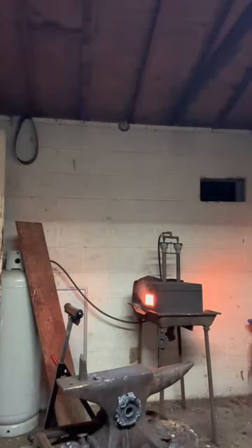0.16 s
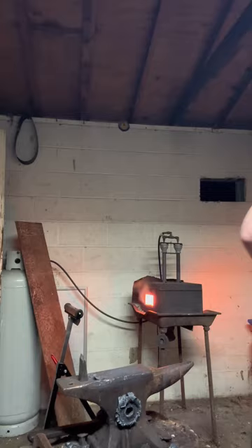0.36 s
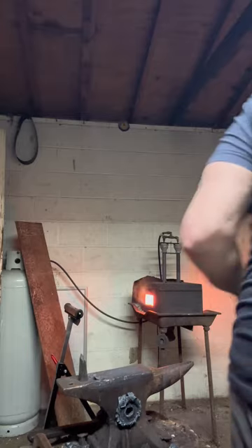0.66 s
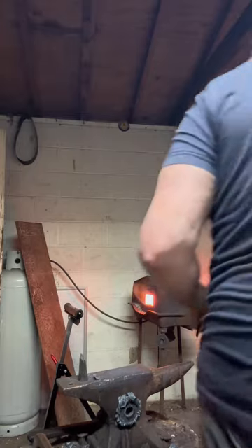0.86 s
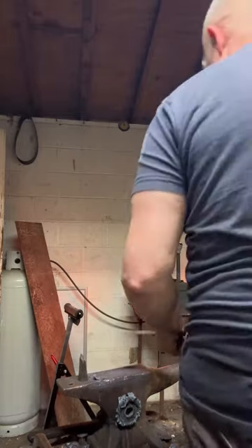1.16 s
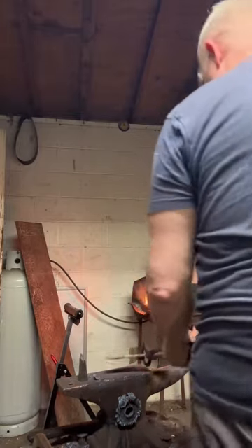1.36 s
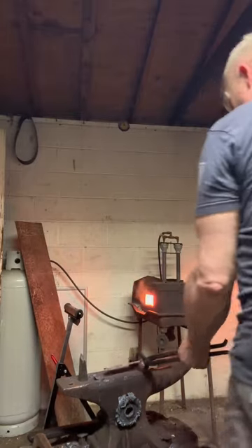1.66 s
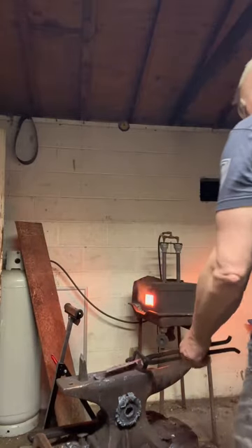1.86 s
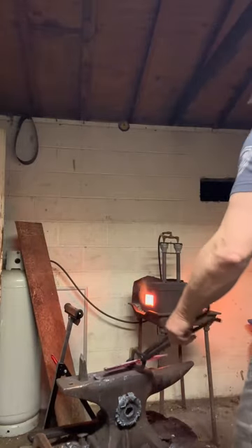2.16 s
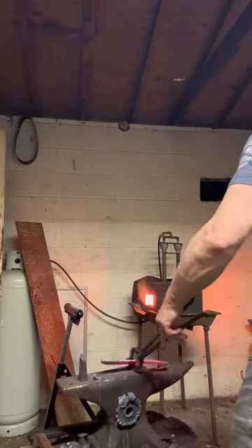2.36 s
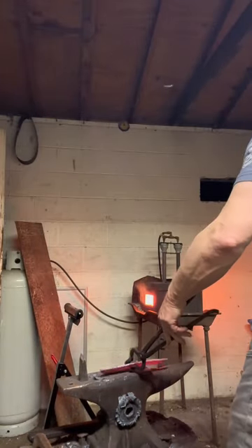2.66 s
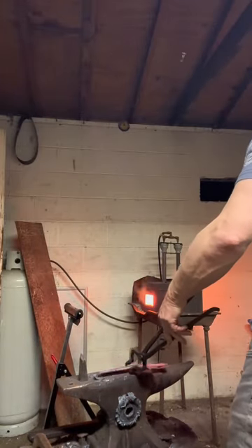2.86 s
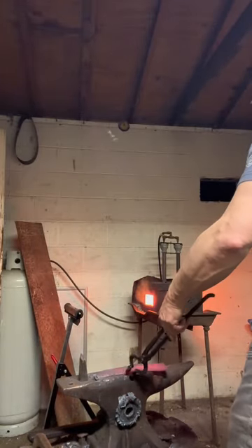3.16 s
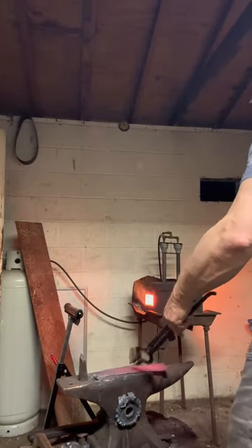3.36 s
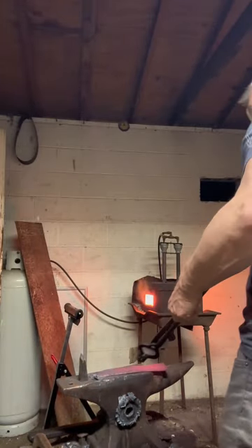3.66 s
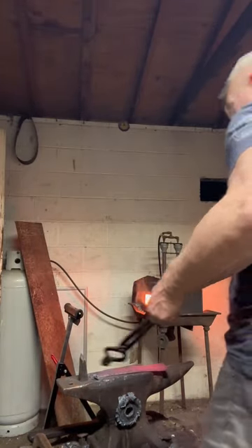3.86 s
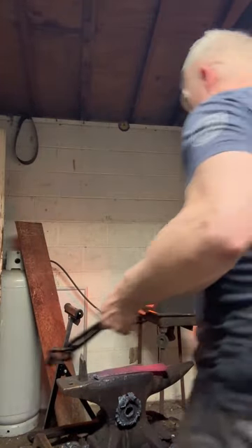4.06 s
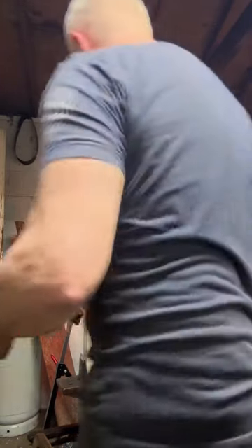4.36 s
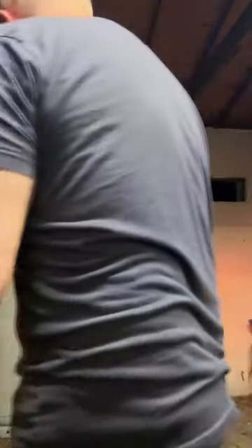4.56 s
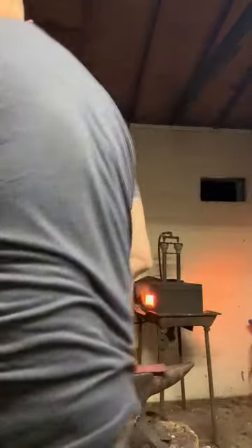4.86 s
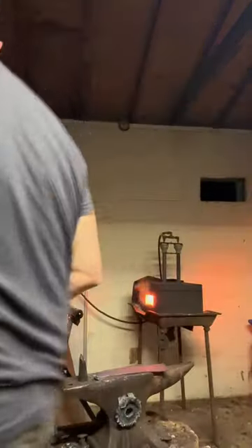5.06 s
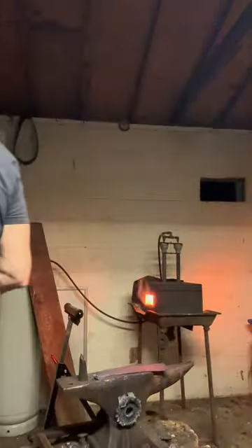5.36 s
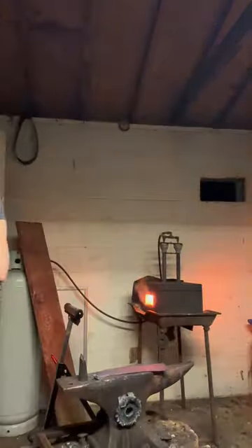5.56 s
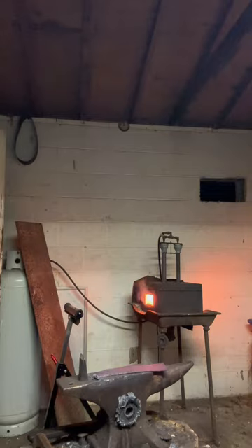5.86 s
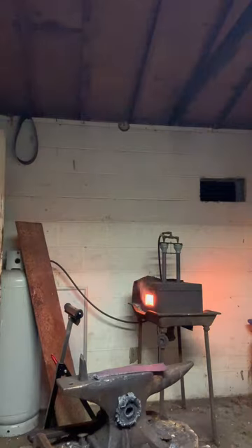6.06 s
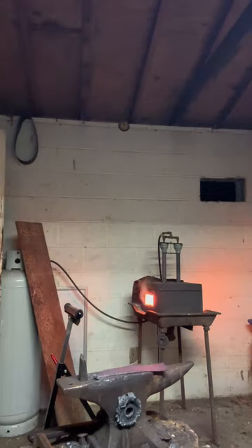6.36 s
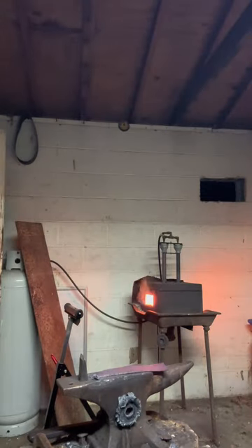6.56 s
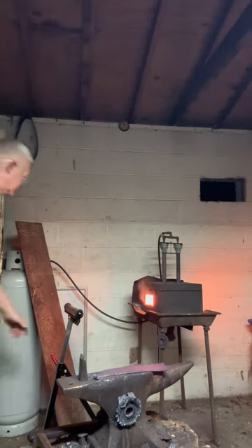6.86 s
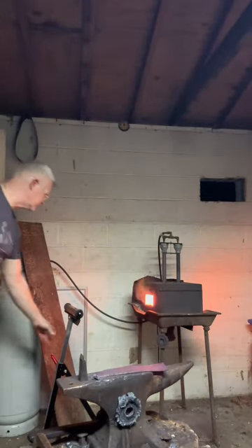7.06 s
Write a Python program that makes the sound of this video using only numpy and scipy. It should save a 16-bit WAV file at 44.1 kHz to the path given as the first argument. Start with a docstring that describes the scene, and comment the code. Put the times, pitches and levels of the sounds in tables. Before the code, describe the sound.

A propane forge roars continuously in a block-walled workshop, deep and hollow with a gas hiss above. Long steel tongs jangle loudly at the start and fade to faint ticks. A hot bar clinks on the anvil near three seconds, then the tong jaws snap with a sharp clank. Shoes scuff gritty floor later as the burner surges. Fixed stereo microphone a few metres away.

```python
"""Propane forge and steel tongs

A forge roars steadily in a block-walled workshop: noise shaped by flame, room and burner-mouth resonances.
Its gas jet is a band of hiss above. A smith's tongs jangle and rattle as he walks to the anvil, a hot bar
clinks there and the jaws clank as they let it go: chatters of tiny blows that crack and ring decaying modes.
Later his shoes scuff the gritty floor in strokes of clumped noise grains."""
import sys
import numpy as np
from scipy import signal
from scipy.fft import rfft, irfft, next_fast_len
from scipy.io import wavfile
from scipy.ndimage import uniform_filter1d

SR = 44100
rng = np.random.default_rng(int(sys.argv[2]) if len(sys.argv) > 2 else 0)


def master(y):
    """Save y as 16-bit WAV."""
    cut = np.clip(np.atleast_2d(y).T, -1, 1)
    pcm = np.round(cut * 32767)  # scale
    wavfile.write(sys.argv[1], SR, pcm.astype(np.int16))


N = 317961


def amp(db):
    """Decibels to gain."""
    return 10 ** (np.asarray(db) / 20)


def evened(x):
    """Scales to rms 1."""
    return x / np.sqrt(np.mean(x ** 2) + 1e-20)


def read(points, hz):
    """Reads a table along a log-frequency axis."""
    f, value = np.transpose(points)
    return np.interp(np.log(hz + 1), np.log(np.abs(f) + 1), value)


def add(mix, s, sound):
    """Mixes a stereo sound in at time s."""
    part = mix[:, max(round(s * SR), 0):][:, :sound.shape[1]]
    part += sound[:, :part.shape[1]]


def coloured(x, points):
    """Filters by a (Hz, dB) table."""
    size = next_fast_len(x.shape[-1] + 1024)
    gain = amp(read(points, np.fft.rfftfreq(size, 1 / SR)))
    return irfft(rfft(x, size) * gain, size)[..., :x.shape[-1]]


def turbulence(density, hz):
    """Churning gas as two unrelated noises of the given spectral density."""
    size = 2 * (len(hz) - 1)
    spectrum = rfft(rng.standard_normal((2, size))) * density * np.sqrt(SR / 2)
    return irfft(spectrum, size)[:, :N]


def peaks(table, hz):
    """Power spectrum of a set of steep resonances."""
    return sum((amp(db) / (1 + ((hz - centre) / (0.58 * width)) ** 2)) ** 2 for centre, width, db in table)


def swept(x, gain):
    """A moving filter; gain is a function of frequency and time."""
    hz, t, z = signal.stft(x, SR, nperseg=2048, noverlap=1536)
    return signal.istft(z * gain(hz[:, None], t), SR, nperseg=2048, noverlap=1536)[1][:, :N]


# Burner drive. Each row: time in seconds, blast in dB before the roar and the jet take their shares of it.
BLAST = [(0, -1.35), (1.7, 0), (3.1, 0.03), (5.3, 0.87), (6.45, 1.5), (6.95, 4.5), (7.21, 6)]
ROAR_FOLLOW, JET_FOLLOW = 0.68, 0.65  # dB of roar or jet per dB of blast


def burner_blast(t):
    """How hard the burner blows: it creeps up, then surges near the end."""
    return np.interp(t, *np.transpose(BLAST))


# Smooth body of the flame noise. Each row: frequency in Hz, density in dB per Hz before trim and blast.
FLAME = [(20, -92), (37, -84), (52, -62.5), (170, -69), (380, -61.5), (520, -66), (720, -71), (1000, -79),
         (1400, -86), (2600, -100), (5000, -112), (16000, -130)]
# Standing waves of the room. Each row: centre in Hz, nominal width in Hz, peak in dB per Hz before trim and blast.
HOLLOWS = [(58.3, 12.8, -54), (66.5, 9.2, -63.5), (110.3, 8, -54.5), (148.4, 7.5, -51), (191, 36, -58),
           (216.2, 28.7, -48), (291.7, 33, -53.5), (320.4, 17.3, -48.5), (377.2, 29, -48.5),
           (423.8, 22, -48.5), (482.3, 12.7, -54.5), (522.5, 53, -58.5), (552, 11.3, -50), (658.5, 40, -60),
           (830, 210, -73)]
SWELL_DB, SWELL_S = -3.5, 0.13  # the roar starts this far down and swells in over about this time


def flame_roar(hz, t, trim_db=-0.3):
    """Turbulent flame noise drives the standing waves of the room, so the roar booms."""
    density = np.sqrt(amp(read(FLAME, hz)) ** 2 + peaks(HOLLOWS, hz))
    swell_in = SWELL_DB * np.exp(-(t / SWELL_S) ** 4)
    return turbulence(density, hz) * amp(trim_db + ROAR_FOLLOW * burner_blast(t) + swell_in)


# Forge mouth and burner tube. Each row: centre in Hz, nominal width in Hz, peak in dB per Hz before the rush level.
MOUTH = [(1140, 150, -86), (1325, 111, -74.5), (1623, 164, -80.5), (1810, 77, -80), (1987, 55, -83.5),
         (2202, 120, -83), (2368, 94, -86), (2857, 430, -89.5), (3526, 83, -87), (9400, 390, -96)]
WANDER_SHARE, WANDER_DB = .009, 1.0  # rms wander: share of pitch, strength in dB


def mouth(hz, t):
    """Gain of the forge mouth: each resonance wanders in pitch and strength as the hot gas churns."""
    noise = rng.standard_normal((len(MOUTH), 2, len(t)))
    drift = evened(uniform_filter1d(uniform_filter1d(noise, size=16), size=8))
    wandering = [(centre * (1 + WANDER_SHARE * bend), width, db + WANDER_DB * swell)
                 for (centre, width, db), (bend, swell) in zip(MOUTH, drift)]
    return np.sqrt(peaks(wandering, hz))


# Rush from the forge mouth. Each row: time in seconds, level in dB before trim.
RUSH_LEVEL = [(0, 2), (1.2, 1), (2.4, 1), (3.3, 1.5), (4.2, 2.5), (5.4, 0.7), (6.4, 2.5), (7.21, 3)]


def mouth_rush(hz, t, trim_db=0.48):
    """Flat noise rushes out through the wandering resonances of the forge mouth."""
    level_db = np.interp(t, *np.transpose(RUSH_LEVEL))
    return swept(turbulence(0.96, hz), mouth) * amp(trim_db + level_db)


# The smith passes before the forge. Each row: middle in seconds, half length in seconds, hiss change in dB.
PASSES = [(1.29, 0.93, -1.5), (4.44, 1, -3)]


def shadow(t):
    """Hiss level change in dB while the smith's body screens the forge."""
    return sum(change_db * np.exp(-((t - s) / half) ** 2) for s, half, change_db in PASSES)


# Gas jet hiss. Each row: frequency in Hz, density in dB per Hz before blast and shadow.
JET = [(500, -110), (2600, -97), (4000, -91.5), (4800, -93.5), (5600, -91), (6600, -100.5), (7300, -98.5),
       (8200, -97), (8800, -99.5), (10500, -99.5), (12200, -106), (13000, -106), (14200, -103),
       (15800, -108)]


def gas_jet(hz, t):
    """Gas hisses out of the jet as treble noise, following the blast and dipping behind the smith."""
    return turbulence(amp(read(JET, hz)), hz) * amp(JET_FOLLOW * burner_blast(t) + shadow(t))


# Swelling and sinking resonances. Each row: middle in seconds, half length in seconds, centre in Hz,
# half width in octaves, change in dB.
SWELLS = [(.62, 0.18, 434, 0.043, 8), (1.248, 0.089, 552, 0.056, 15), (1.63, 0.099, 325, .053, 8.5),
          (1.8, 0.43, 216.4, 0.037, 7.5), (4.43, .13, 386, 0.049, 11), (4.503, 1.4, 657, .053, -5),
          (5.2, 0.12, 544, 0.085, -7), (5.24, 0.12, 327, 0.086, 8), (4.948, .12, 58, 0.22, 11),
          (6.92, 0.11, 220, 0.039, 5.5), (1.603, 1.4, 1360, .15, -0.5), (5.1, 0.48, 1770, 0.12, 3.5)]


def swelling(hz, t):
    """Gain of the resonances that swell or sink as the smith moves."""
    total_db = 0
    for s, half, centre, octaves, db in SWELLS:
        off_pitch = np.log2((hz + 1) / centre) / octaves
        total_db = total_db + db * np.exp(-((t - s) / half) ** 2 - off_pitch ** 2)
    return amp(total_db)


def rippled(x, fixed_db, drift_db):
    """Wall reflections carve fine ripples in the middle and treble; some stand still, some drift."""
    hz, _, z = signal.stft(x, SR, nperseg=2048, noverlap=1536)
    still = evened(uniform_filter1d(rng.standard_normal((2, len(hz), 1)), size=2, axis=1))
    drift = uniform_filter1d(rng.standard_normal(z.shape[1:]), size=4, axis=0)
    drift = evened(uniform_filter1d(drift, size=22, axis=1))
    depth = read([(500, 0.054), (1100, 1.0), (4000, 1.0), (10000, 0.0)], hz)[:, None]
    ripple = amp(depth * (fixed_db * still + drift_db * drift))
    return signal.istft(z * ripple, SR, nperseg=2048, noverlap=1536)[1][:, :N]


def burner(flutter_db=0.88):
    """Flame roar, mouth rush and jet hiss share the wall ripples and one small flutter (rms dB)."""
    hz = np.fft.rfftfreq(2 * next_fast_len(N // 2 + 1), 1 / SR)
    t = np.arange(N) / SR
    fire = swept(flame_roar(hz, t) + mouth_rush(hz, t), swelling)
    flutter = evened(uniform_filter1d(rng.standard_normal(N), size=2500))
    return rippled(fire + gas_jet(hz, t), fixed_db=1.5, drift_db=1.7) * amp(flutter_db * flutter)


# Workshop echo. Each row: frequency in Hz, t60 in seconds.
ROOM = [(200, 0.36), (2000, 0.44), (6000, 0.19), (14000, 0.21)]


def workshop(x, wet_db):
    """Direct sound plus dense wall reflections, each band dying at its own t60."""
    t = np.arange(SR // 2) / SR
    taps = rng.standard_normal((2, len(t))) * (t > .003)
    hz, when, z = signal.stft(taps, SR, nperseg=256)
    tail = signal.istft(z * amp(-60 * when / read(ROOM, hz)[:, None]), SR, nperseg=256)[1]
    tail *= amp(wet_db) / np.linalg.norm(tail[0])
    tail[:, 0] += 1  # direct sound
    return signal.fftconvolve(x, tail, axes=1)


def steel(length, tilt_db, modes, crack_colour, crack_db, crack_s, wet_db, uneven_db, touches_per_s, shimmer):
    """One contact is a chatter of tiny blows; each blow gives a brief crack and feeds the steel's modes."""
    t = np.arange(SR // 2) / SR
    hz, db, t60 = np.transpose(modes)[:, :, None]
    touching = (rng.random(len(t)) < touches_per_s / SR) * (t < length)
    blows = .5 * rng.standard_normal(len(t)) * touching
    blows[0] = 1
    # the energy of the blows piles up in each mode and leaks away
    energy = np.array([signal.lfilter([1], [1, -amp(-60 / SR / life) ** 2], blows ** 2) for life in t60[:, 0]])
    # the place of contact sets each mode's share
    weight = amp(db + tilt_db * np.log2(hz / 4000) + uneven_db * rng.standard_normal(hz.shape))
    # reflections and fresh blows make each partial shimmer (rms radians), differently at each port
    waver = rng.random((2, len(hz), len(t)), np.float32) - .5
    waver = evened(uniform_filter1d(waver, size=600))
    phase = np.float32(2 * np.pi * (hz * t + rng.random((2, len(hz), 1)))) + np.float32(shimmer) * waver
    ring = (weight * np.sqrt(energy) * np.sin(phase)).sum(1)
    tilted = [(f, d + tilt_db * np.log2(max(f / 4000, .5))) for f, d in crack_colour]
    snap = coloured(rng.standard_normal((2, len(t))), tilted) * np.exp(-t / crack_s)
    snaps = signal.fftconvolve(blows[None], snap, axes=1)[:, :len(t)]
    crack = workshop(snaps, wet_db)[:, :len(t)]
    sound = evened(ring) + amp(crack_db) * evened(crack)
    loudest = uniform_filter1d((sound ** 2).mean(0), size=1024).max()
    return sound / np.sqrt(loudest)


# Ring of the long tongs. Each row: mode in Hz, level in dB hanging free, level in dB held in the hand,
# t60 in seconds. Levels are relative, before tilt and favour.
TONGS = [(712, -1, -12, .4), (1300, -12, -10, .3), (1561, 3, -7, .28), (1658, -5, -3, .32),
         (2040, -5, -9, .3), (2478, -4, -6, .32), (2513, -4, -1, .28), (2718, -1, 3, .25),
         (2887, -4, -2, .36), (3010, -7, -6, .28), (3085, -18, -3, .22), (3250, -14, -9, .25),
         (3424, -17, -12, .3), (3580, -7, -5, .24), (3700, 3, -6, .27), (3876, -15, -10, .25),
         (4107, 0, -8, .22), (4200, -7, -1, .3), (4270, -11, -3, .3), (4680, -11, -8, .2),
         (4782, -2, -7, .25), (4880, -14, -6, .22), (5243, -13, -12, .25), (5380, -18, -10, .2),
         (5470, -7, -10, .2), (5686, -7, -13, .6), (5805, -6, -14, .3), (6210, -11, -13, .2),
         (6440, -10, -12, .17), (7120, -10, -16, .17), (7820, -6, -13, .17), (8500, -15, -18, .15),
         (9250, -16, -19, .2), (10100, -17, -21, .2), (10450, -17, -21, .2), (12000, -22, -26, .2)]
# Jangle and rattle. Each row: start in seconds, loudest short-term level in dB, chatter length in seconds,
# treble tilt in dB per octave, grip from 0 (free) to 1 (held), frequency in Hz that the contact favours.
RATTLES = [(0, -30.5, .04, 0, 0, 3700), (.04, -34.5, .016, 1, 0, 1620), (.055, -28.5, 0.011, -1.5, 0, 3800),
           (.072, -30, 0.019, -1.5, 0.2, 2520), (.108, -32.5, 0.013, 0, 0.1, 3570),
           (.127, -34.5, 0.011, 2, 0, 4800), (0.151, -38, .03, -2, 0.5, 5700),
           (.245, -48, .012, -4, .8, 2700), (.258, -39.5, .022, -3, 1, 2930),
           (.338, -47.5, .025, -4, .6, 2700), (.405, -55, .03, -3, 1, 4250), (.493, -51, .004, -7, 1, 4250),
           (0.542, -46, .03, -2.5, 0.95, 4250), (.6, -53, .04, -9, 0.9, 2500),
           (.684, -55, .02, 2, 0.9, 4250), (0.725, -49.5, .008, 2, 1, 4250),
           (.742, -51, .008, -4, 0.9, 2500), (0.839, -54, .01, -1, 1, 2700),
           (.851, -48.5, .018, -3, 1, 3670), (.957, -49.5, .01, -1, 0.9, 4850),
           (0.969, -50, .025, 1, 0.7, 2550), (1.02, -55, .02, 2, 1, 2700),
           (1.07, -44.5, .03, -6, 0.9, 1680), (1.641, -49.5, .014, 3, 0.9, 2500),
           (2.859, -51, .025, -2, 1, 2900)]
# Crack against ring in dB: hanging free, then held in the hand.
TONGS_CRACK_DB = (-9, -8)
FAVOUR_DB, FAVOUR_OCTAVES = 4.5, .13  # lift of the favoured modes, half width


def tongs():
    """Long steel clatters, its cracks mostly wall echo; grip and place of contact set which modes ring."""
    colour = [(300, -22), (800, 0), (2800, 3.5), (4200, 3), (6000, -2), (8000, -11), (10500, -9),
              (13000, -19), (15800, -26)]
    out = np.zeros((2, N))
    hz, free, held, t60 = np.transpose(TONGS)
    for s, level_db, length, tilt_db, grip, favoured_hz in RATTLES:
        favour = FAVOUR_DB * np.exp(-(np.log2(hz / favoured_hz) / FAVOUR_OCTAVES) ** 2)
        db = free + np.clip(grip, 0, 1) * (held - free) + favour
        crack_db = np.interp(grip, [0, 1], TONGS_CRACK_DB)
        rattle = steel(length, tilt_db, np.transpose([hz, db, t60]), colour, crack_db, crack_s=.002,
                       wet_db=4, uneven_db=2, touches_per_s=800, shimmer=.6)
        add(out, s, amp(level_db) * rattle)
    return out


# Short ring of the jaws. Each row: mode in Hz, relative level in dB before tilt, t60 in seconds.
JAWS = [(1960, -11, .3), (2293, -5, .3), (2835, 2, .34), (3246, -3, .22), (3690, 7, .17), (3900, 1, .11),
        (4130, 4, .12), (4400, -3, .14), (4850, -6, .17), (5776, -1, .17), (5940, 0, .22), (6670, 3, .13),
        (7450, -2, .14), (8650, -6, .12), (8930, 1, .14), (9260, -5, .15), (9738, -2, .13),
        (10270, -3, .15), (11560, -6, .15), (12960, -3, .15), (13220, -3, .15), (13600, -5, .15)]
# The jaws bite the bar, later snap together. Each row: start in seconds, loudest short-term level in dB,
# chatter length in seconds, treble tilt in dB per octave.
CLANK = [(1.642, -47, .003, 0), (1.655, -54, .003, 0), (3.4387, -30.5, .001, 3.5)]


def jaws():
    """Bright, quickly damped clanks as the jaws take the bar, and as they let go and snap together."""
    colour = [(300, -15), (1500, -4), (3000, 0), (3550, 8), (4100, 10), (4900, -1), (6500, 1), (9000, 0),
              (11500, -4), (13400, -1), (14300, -12), (15800, -12)]
    out = np.zeros((2, N))
    for s, level_db, length, tilt_db in CLANK:
        clank = steel(length, tilt_db, JAWS, colour, crack_db=-2.5, crack_s=.001,
                      wet_db=1, uneven_db=1, touches_per_s=400, shimmer=.6)
        add(out, s, amp(level_db) * clank)
    return out


# Ring of the bar on the anvil. Each row: mode in Hz, relative level in dB before tilt, t60 in seconds.
BAR = [(2050, -7, .2), (2250, -8, .2), (2820, -6, .28), (3381, -7, .28), (4130, -4, .12), (4290, 2, .13),
       (4540, -3, .12), (5566, -1, .15), (5900, -7, .12), (6202, 2, .14), (7250, -5, .12), (7520, -3, .12),
       (7810, 8, .12), (8400, -8, .12), (9000, -7, .12), (9350, -7, .11), (9660, -4, .1), (10640, -2, .14),
       (11600, -11, .11), (12450, -6, .11), (12750, -5, .1), (13400, -13, .1)]
# Knocks and scrapes. Each row: start in seconds, loudest short-term level in dB, chatter length in seconds,
# treble tilt in dB per octave, crack against ring in dB.
KNOCKS = [(1.654, -50, .003, -5, 0), (2.461, -48, .002, -3, 4), (2.487, -50, .003, -3, -7),
          (2.519, -51, .012, -2, 3), (2.575, -58, 0.037, -9, 8), (2.71, -60, .003, -5, 6),
          (2.793, -61, .025, -7, 8), (2.905, -56, .04, -7, 7), (2.957, -43.5, .003, 4, -1),
          (2.964, -39.5, 0.0089, -2, -6), (2.975, -43, .012, -1, -7)]


def bar():
    """The bar ticks, scrapes and clinks on the anvil as it is set down and turned: short rings and cracks."""
    colour = [(300, -12), (1500, 0), (3200, 1), (4300, 5), (6000, 3), (7800, 1), (10000, -2), (12700, -4),
              (15800, -13)]
    out = np.zeros((2, N))
    for s, level_db, length, tilt_db, crack_db in KNOCKS:
        knock = steel(length, tilt_db, BAR, colour, crack_db, crack_s=.0012,
                      wet_db=1, uneven_db=1, touches_per_s=500, shimmer=.6)
        add(out, s, amp(level_db) * knock)
    return out


# Shoes on grit. Each row: start in seconds, length in seconds, level in dB before the stroke shapes it,
# treble tilt in dB per octave.
SCUFFS = [(5.694, 0.081, -54, 5), (6.214, 0.15, -38.5, 0.5), (6.844, 0.082, -37, -0.5)]
# Colour of the scuffs. Each row: frequency in Hz, relative level in dB before tilt.
GRIT = [(100, -5), (350, 22), (800, -6), (1600, 2.5), (3000, 5), (4500, 3.5), (6200, 0), (8000, -3),
        (10500, -4.5), (14000, -13)]


def shoes(grain_db=3.6, wet_db=-1):
    """A sole drags over grit: dense grains swell and fade, in clumps as it catches and slips."""
    out, t = np.zeros((2, N)), np.arange(SR // 3) / SR
    for s, length, level_db, tilt_db in SCUFFS:
        spikes = amp(grain_db * np.minimum(rng.exponential(1, len(t)), 5))
        grains = rng.standard_normal((2, len(t))) * spikes
        clumps = amp(2.2 * evened(uniform_filter1d(rng.standard_normal(len(t)), size=110)))
        stroke = np.abs(np.sin(np.pi * np.minimum(t / length, 1))) ** .7
        colour = [(hz, db + tilt_db * np.log2(hz)) for hz, db in GRIT]
        scrape = workshop(evened(coloured(grains * clumps, colour)) * stroke, wet_db)
        # the division makes room for the echo's energy
        add(out, s, amp(level_db) * scrape / np.sqrt(1 + amp(wet_db) ** 2))
    return out


# Likeness of the two ports. Each row: frequency in Hz, likeness from 0 to 1.
LIKENESS = [(60, .9995), (200, .992), (380, .975), (650, .9), (1000, .58), (1340, .3), (2200, .68),
            (3000, .65), (4500, .4), (5600, .55), (6600, .7), (7300, .99), (8400, .99), (9500, .8),
            (10800, .99), (12800, .99), (13800, .8), (15000, .98)]
# Phase between the ports. Each row: frequency in Hz, lead of the left in radians.
LEAD = [(60, 0), (250, -.03), (600, -.1), (1030, .8), (2150, -.2), (3100, .8), (4400, .4), (5400, -1.4),
        (6700, -2.1), (7300, -3.05), (8300, -3.25), (9400, -4.7), (10600, -6.1), (12700, -6.5), (14200, -8),
        (14900, -9.3)]
# Balance of the ports. Each row: frequency in Hz, left minus right in dB.
BALANCE_DB = [(60, 0), (200, -.8), (400, -1.2), (700, -1.8), (1300, -1.8), (2800, .8), (5500, 1.1),
              (10000, 0)]


def ports(pair):
    """The two microphone ports: alike in the bass, diffuse in the middle, alike but out of step in the treble."""
    size = next_fast_len(N + 2048, True)
    hz = np.fft.rfftfreq(size, 1 / SR)
    common, other = rfft(pair, size)
    alike = np.clip(read(LIKENESS, hz), 0, 1)
    right = (alike * common + np.sqrt(1 - alike ** 2) * other) * np.exp(-1j * read(LEAD, hz))
    lean = amp(read(BALANCE_DB, hz) / 2)
    return irfft(np.array([common * lean, right / lean]), size)[:, :N]


def scene():
    """The forge, and the smith at work around it."""
    return ports(burner() + tongs() + jaws() + bar() + shoes())


EDGE_HZ = 15800


def record(dry):
    """A steep low-pass limits the band at its upper edge."""
    lowpass = signal.firwin(255, EDGE_HZ, window=("kaiser", 9), fs=SR)
    return signal.oaconvolve(dry, lowpass[None], "same")


dry = scene()
out = record(dry)
master(out)
```